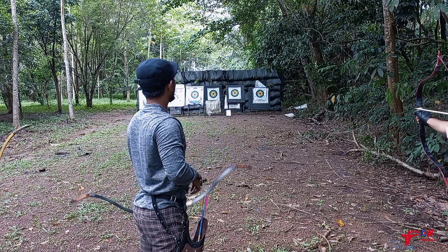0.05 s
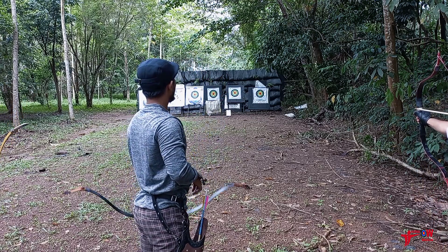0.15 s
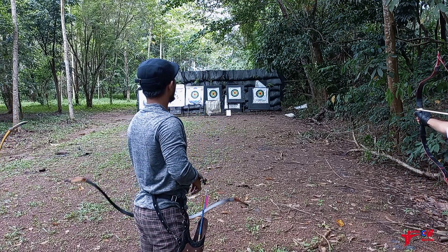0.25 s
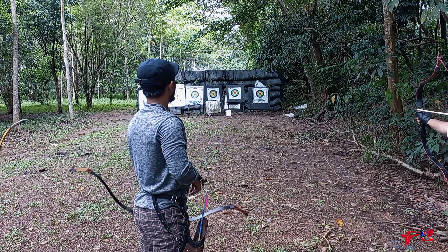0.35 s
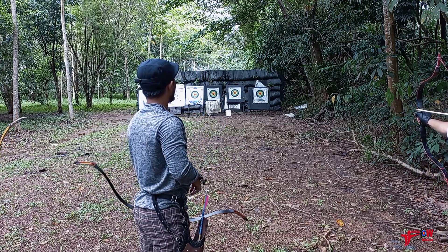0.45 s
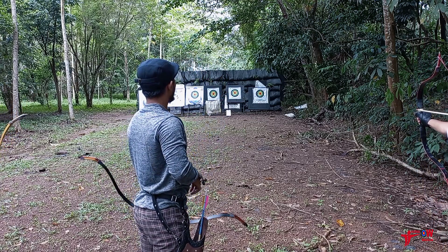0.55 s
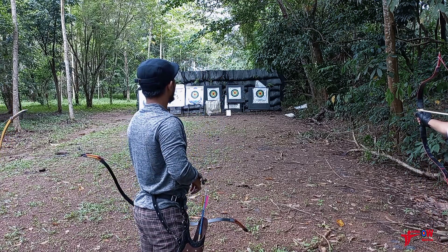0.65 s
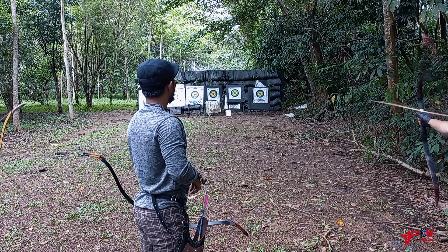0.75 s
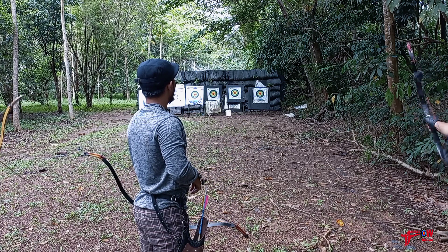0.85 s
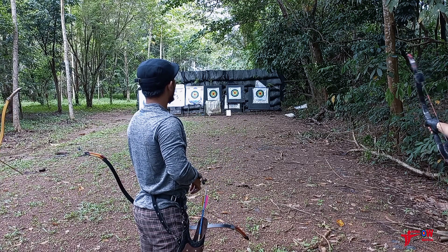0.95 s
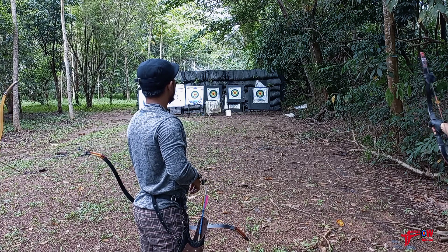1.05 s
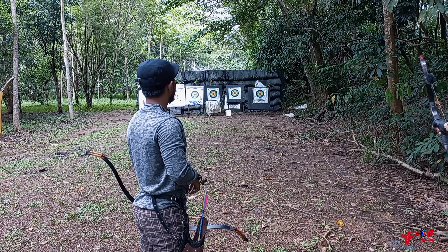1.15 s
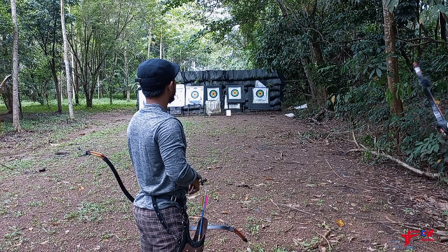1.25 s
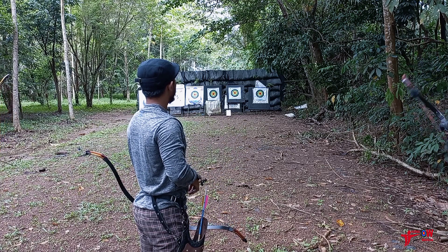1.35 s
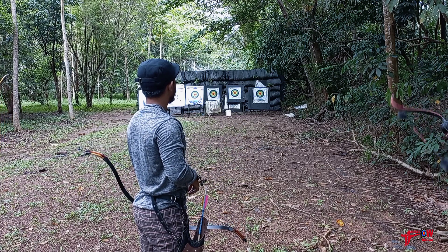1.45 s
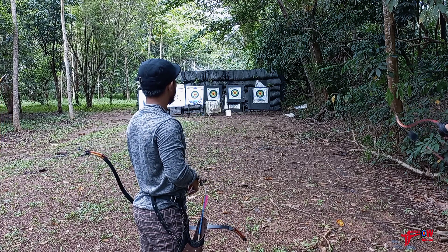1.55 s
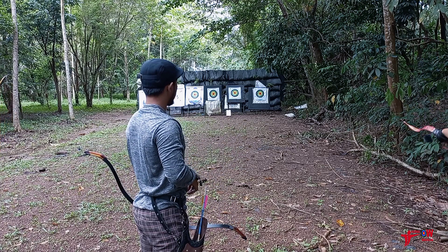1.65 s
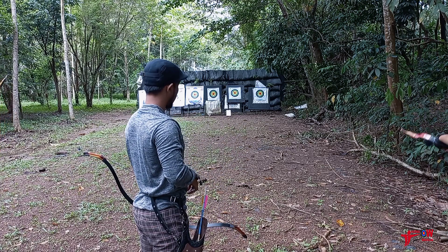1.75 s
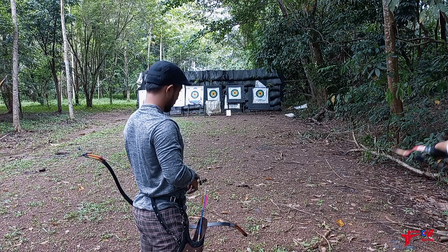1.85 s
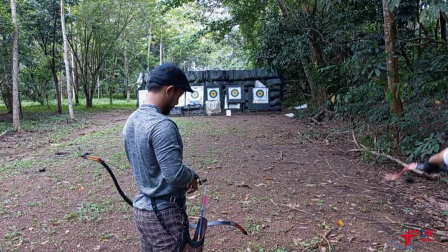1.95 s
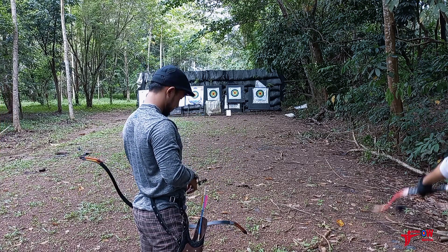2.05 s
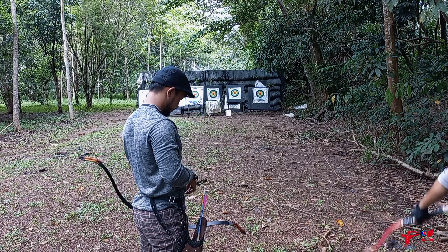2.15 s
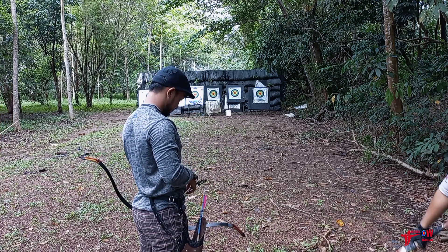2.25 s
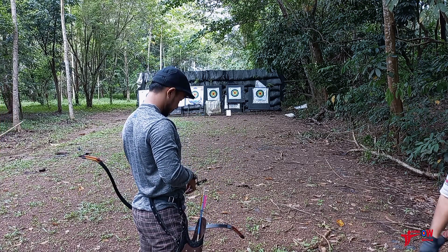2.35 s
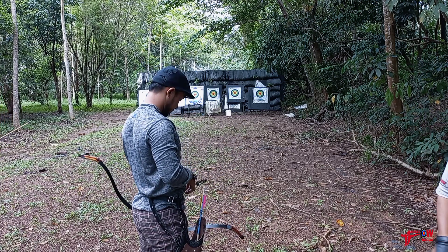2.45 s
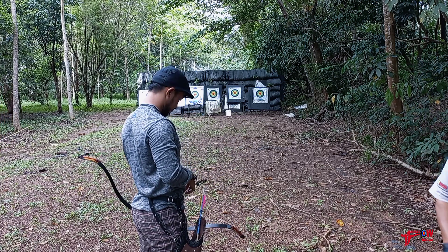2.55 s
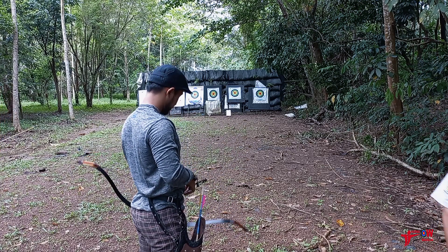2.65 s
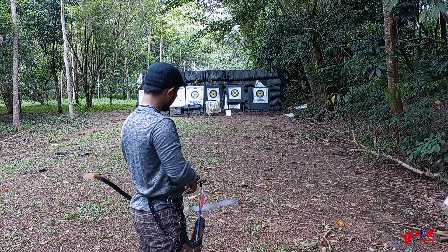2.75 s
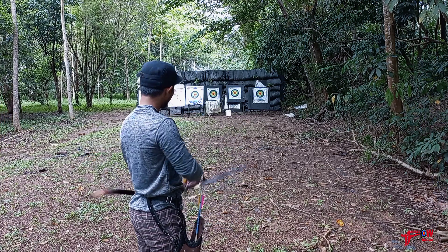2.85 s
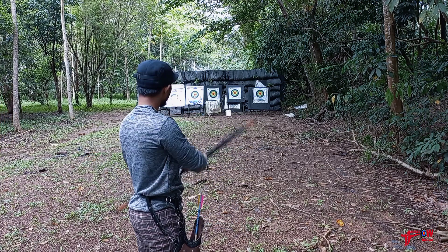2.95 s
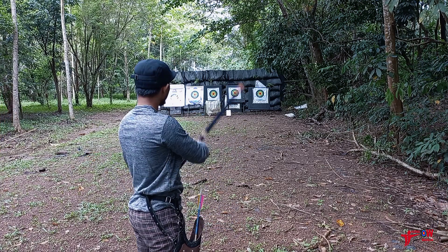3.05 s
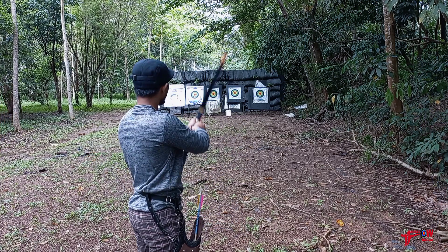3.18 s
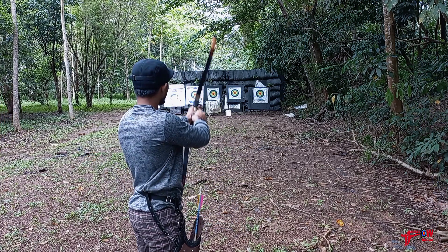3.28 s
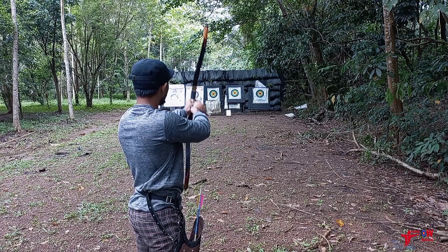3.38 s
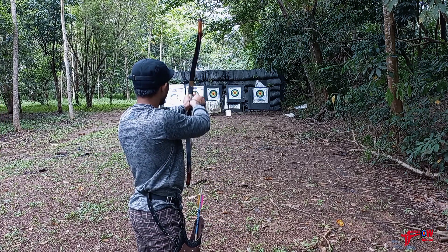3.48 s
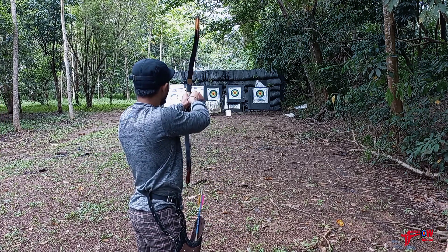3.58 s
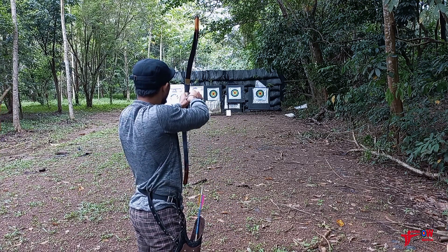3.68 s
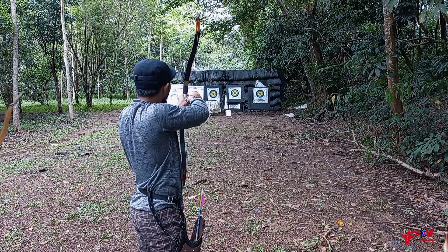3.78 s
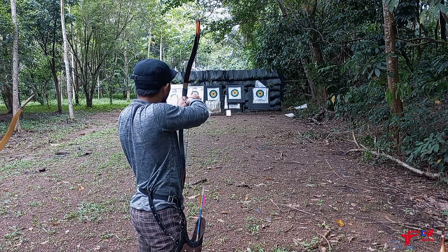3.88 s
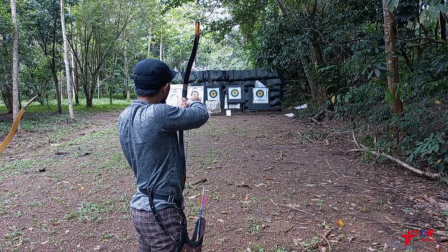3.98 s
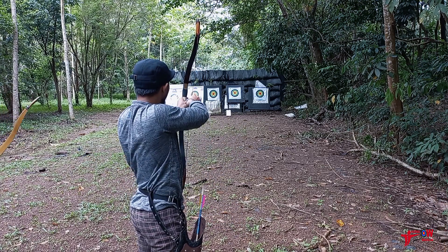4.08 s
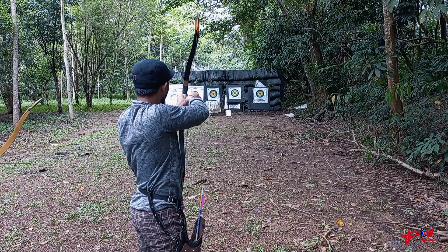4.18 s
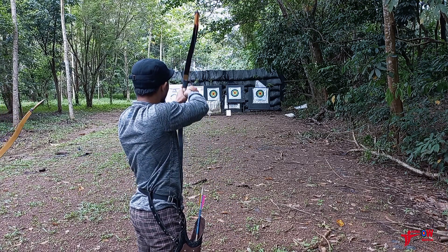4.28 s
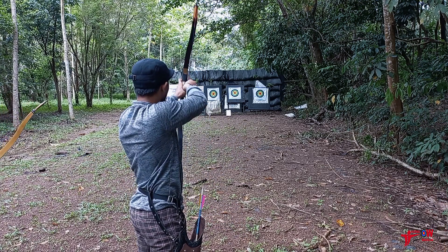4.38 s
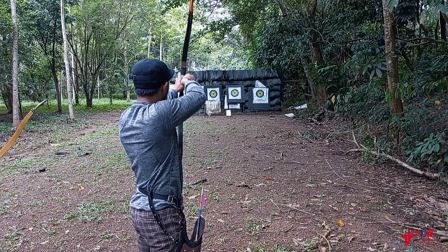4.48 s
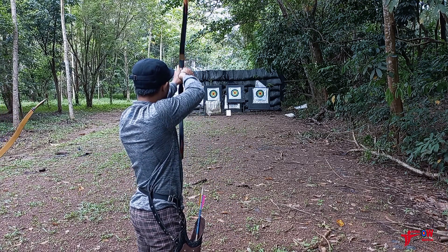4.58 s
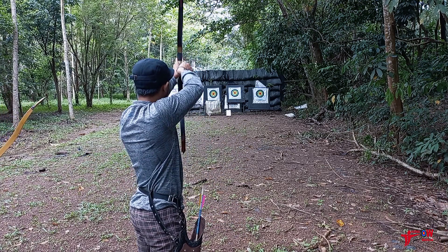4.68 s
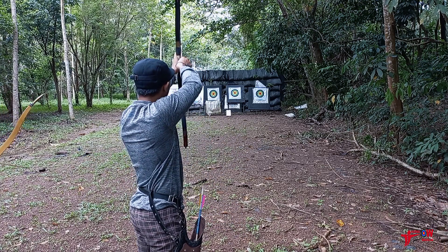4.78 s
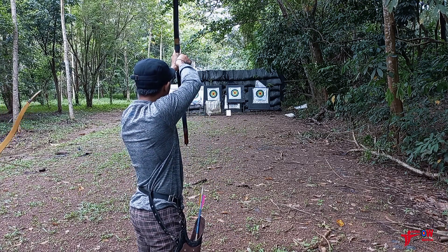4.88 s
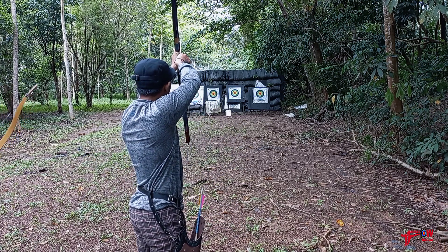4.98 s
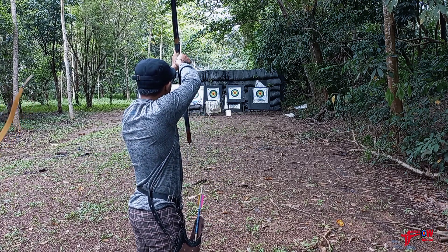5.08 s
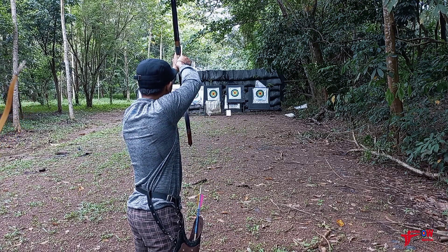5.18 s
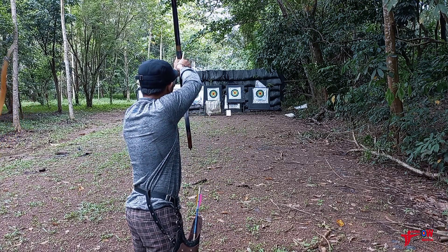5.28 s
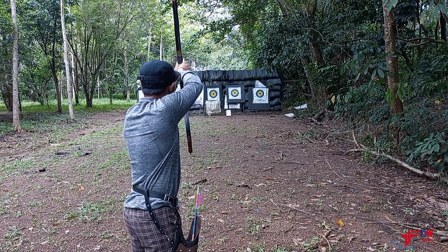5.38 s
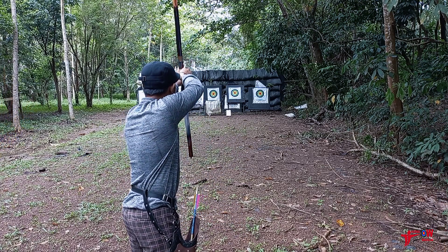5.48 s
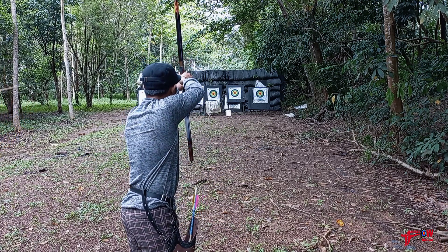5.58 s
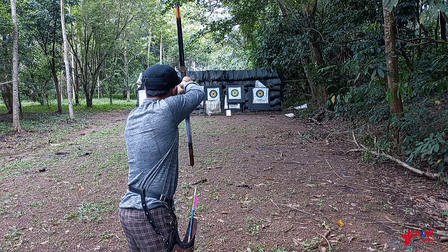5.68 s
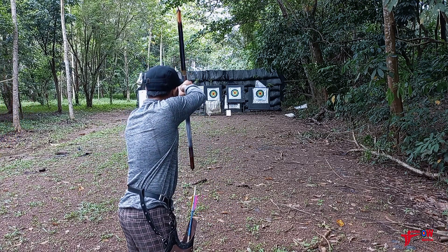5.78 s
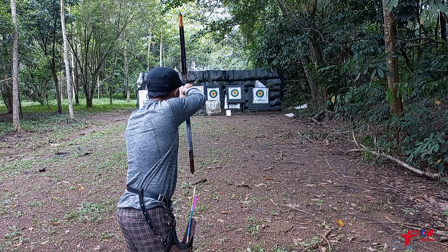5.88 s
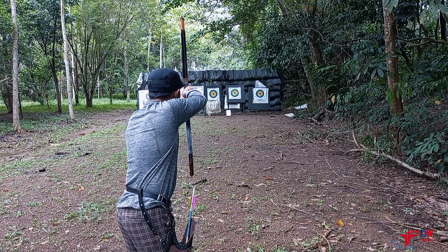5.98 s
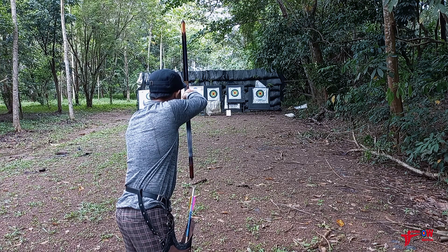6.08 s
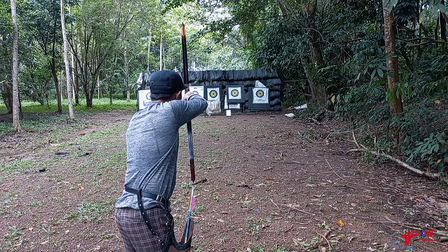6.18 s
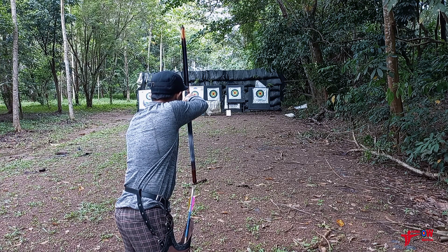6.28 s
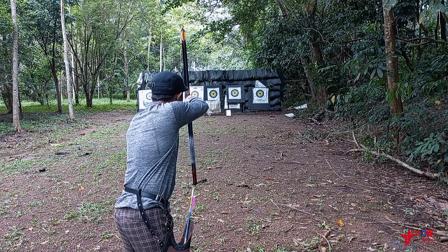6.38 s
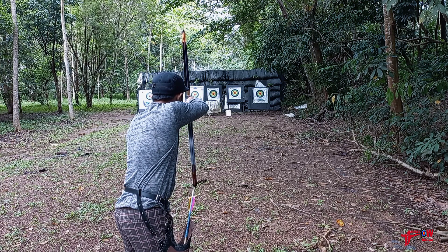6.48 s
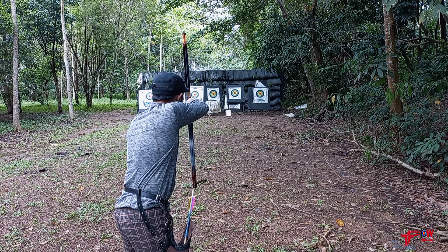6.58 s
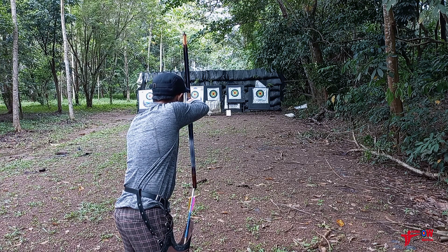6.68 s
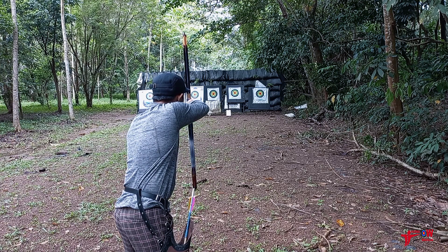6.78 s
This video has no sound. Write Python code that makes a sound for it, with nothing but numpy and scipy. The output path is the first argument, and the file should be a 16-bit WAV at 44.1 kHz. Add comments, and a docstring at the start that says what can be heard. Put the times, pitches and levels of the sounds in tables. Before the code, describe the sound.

Insects chirr steadily at an outdoor range among trees. An arrow shaft clicks lightly on a bow, then a nearby string slaps with a woody thump, and a far target cracks about half a second later. A second, sharper release and hit follow. Afterwards only soft bumps, sleeve brushes and faint ticks of another archer drawing remain. The microphone stands close behind the archers.

```python
"""Two bows loose close to the microphone: the string slips off the fingers, slaps home and the limbs thump.
About half a second later each arrow cracks into a far target, and the trees scatter the sound back.
A third archer quietly nocks and draws, while cicadas and crickets chirr over a low distant rumble.
Bursts and rubs are shaped noise, limbs, shafts and butts are decaying sines, and the wood is a diffuse
echo; cicadas are bands of noise, crickets are gliding tones."""
import sys
import numpy as np
from scipy import signal
from scipy.fft import rfft, irfft
from scipy.io import wavfile
from scipy.ndimage import uniform_filter1d

SR = 44100
rng = np.random.default_rng(int(sys.argv[2]) if len(sys.argv) > 2 else 0)


def transcribe(signal):
    """Save signal, clipped to [-1, 1], as a 16-bit WAV file at the path in sys.argv[1]."""
    frames = np.atleast_2d(signal).T
    limited = np.clip(frames, -1, 1)
    pcm = np.round(limited * 32767).astype(np.int16)
    wavfile.write(sys.argv[1], SR, pcm)


N = 301644
TIME = np.arange(N) / SR  # s
BRIEF = TIME[:16384]  # time axis of one short event, s


def undb(db):
    """Decibels to gain."""
    return 10 ** (np.asarray(db) / 20)


def unit(x):
    """Scale to rms 1."""
    return x / np.sqrt(np.mean(x ** 2) + 1e-20)


def add(out, s, x):
    """Mix x into out from time s, dropping whatever falls outside."""
    i = int(round(s * SR))
    x, i = x[max(-i, 0):], max(i, 0)
    out[i:i + len(x)] += x[:max(len(out) - i, 0)]


def curve(points, f):
    """Gain at each frequency f, from (f/Hz, level/dB) points joined on a log-frequency axis."""
    hz, db = np.transpose(points)
    return undb(np.interp(np.log(f + 1), np.log(hz), db))


def coloured(points, size):
    """Noise of rms 1 with a spectrum of (f/Hz, level/dB) points."""
    f = np.fft.rfftfreq(size, 1 / SR)
    white = rfft(rng.standard_normal(size))
    return unit(irfft(white * curve(points, f), size))


def band(hz, width_hz, size):
    """Noise of rms 1 in one bell-shaped resonance."""
    f = np.fft.rfftfreq(size, 1 / SR)
    bell = .5 ** (2 * ((f - hz) / width_hz) ** 2)
    return unit(irfft(rfft(rng.standard_normal(size)) * bell, size))


def walk(rate, size):
    """Random levels, rate of them a second, joined by straight lines."""
    place = TIME[:size] * rate
    return np.interp(place, np.arange(8192), rng.standard_normal(8192))


def fade(t, t60):
    """Exponential decay by 60 dB in t60 seconds, held at full level before t = 0."""
    return np.exp(-np.log(1000) * np.maximum(t, 0) / max(t60, 1e-3))


def ring(modes, tilt_db=0):
    """Struck modes as decaying sines, tilted in dB per octave about their mean pitch."""
    centre = np.mean([mode[0] for mode in modes])
    total = 0
    for hz, db, t60 in modes:
        gain = undb(db + tilt_db * np.log2(hz / centre))
        total = total + gain * np.sin(2 * np.pi * hz * BRIEF) * fade(BRIEF, t60)
    return total


def stroke(length, hz, width_hz):
    """One surface sliding over another: a resonant rub that swells and dies."""
    swell = np.sin(np.pi * np.minimum(BRIEF / length, 1))
    return swell * band(hz, width_hz, size=len(BRIEF))


def spread(points, envelope):
    """A burst as it radiates to all sides: the same energy, evened out to its mean colour."""
    return coloured(points, size=len(BRIEF)) * np.sqrt(np.mean(envelope ** 2))


# what the trunks do to the colour of the echo: [f/Hz, level/dB]
TREE_COLOUR = [(60, 7.5), (180, -3.5), (500, -0.5), (1000, 1), (2000, 3), (4000, 0), (8000, -1),
               (15000, -3)]


def wood(sound, hold_s, t60_s, treble_t60_s, blur_hz):
    """Every trunk hears another side of a sound: a diffuse echo of its blurred spectrum, fading in two bands."""
    t, f = TIME[:SR], np.fft.rfftfreq(SR, 1 / SR)
    power = uniform_filter1d(np.abs(rfft(sound, SR)) ** 2, max(int(blur_hz), 1))  # bins are 1 Hz apart
    colour = np.sqrt(np.abs(power)) * curve(TREE_COLOUR, f)
    scatter = rfft(rng.standard_normal(SR)) * colour / np.sqrt(SR)
    treble = 1 / (1 + (3500 / (f + 1)) ** 4)  # share of each frequency that fades with the treble
    tail = 0
    for share, t60 in [(1 - treble, t60_s), (treble, treble_t60_s)]:
        envelope = unit(fade(t - hold_s, t60) * np.minimum(t / 0.007, 1))
        tail = tail + irfft(scatter * share, SR) * envelope
    return tail * undb(2.1 * walk(170, size=SR) - 2.0)


# string slipping off the fingers and arrow sliding past the bow:
# [t/s, level/dB, hold before the decay/s, t60/s, echo relative level/dB]
SLIPS = [(0.8021, -21, 0.00736, .03, -14), (1.548, -39.5, 0.02, 0.055, 5)]
# colour of that slip: [f/Hz, level/dB]
SLIP_COLOUR = [(100, -3), (300, 0.5), (800, 1), (1600, -6.5), (3000, -8.5), (4500, -6.5), (5800, -3),
               (7000, -16.5), (8500, -14.5), (15000, -22)]
# string slapping home, one row a bow; the slap and limb levels flutter about these values:
# [t/s, level/dB, hold before the decay/s, t60/s, limb level/dB, echo relative level/dB]
SNAPS = [(0.8219, -15, 0.00244, 0.061, -22.5, -7), (1.5686, -12, 0.0012, 0.038, -34, -6)]
# colour of the slap, one list a bow: [f/Hz, level/dB]
SNAP_COLOURS = [
    [(88, -31.5), (150, -15), (420, -24.5), (1660, -23.5), (1910, -17), (2100, -25), (2310, -12.5),
     (2810, -19), (4650, -12.5), (7860, -21.5), (9360, -24), (13300, -25), (15500, -24.5)],
    [(88, -35), (150, -35), (618, -3.5), (1600, -5.5), (2600, -3.5), (3550, 2), (4750, 2), (5230, 1),
     (7410, -3.5), (8010, -1.5), (8660, -6), (12000, 1.5), (15500, -4.5)],
]
# ringing limbs and string, one list a bow: [f/Hz, level/dB, t60/s]
LIMB_MODES = [
    [(82, 2, 0.1), (174, -2, 0.084), (304, -2, 0.074), (372, -4, 0.064), (453, -7, 0.13),
     (803, -12.5, 0.16), (1880, -17, 0.1), (2407, -17.5, 0.28), (3336, -14, 0.17), (4070, -18, 0.2),
     (4800, -16, .2)],
    [(126, 4.5, 0.11), (376, -13, 0.31), (463, 1.5, 0.16), (600, -8.5, 0.49), (766, -11, 0.35),
     (990, -12, 0.11), (2140, -7, 0.26), (3160, -6, 0.12)],
]
# string rebounding on its limbs, one row a bow:
# [period/s, buzz f/Hz, width/Hz, first level/dB, change per rebound/dB]
REBOUNDS = [(0.02, 5200, 590, -28.5, -5), (0.0099, 2960, 340, -23.5, -27)]


def bows():
    """Close by: the string slips as a noise burst, slaps home, sets limbs ringing and buzzes on each rebound."""
    size = len(BRIEF)
    sounds = []  # (t/s, direct sound, sound sent into the trees, echo level/dB)
    for s, db, hold, t60, echo_db in SLIPS:
        envelope = undb(db) * np.minimum(BRIEF / 0.0034, 1) * fade(BRIEF - hold, t60)
        slip = envelope * coloured(SLIP_COLOUR, size)
        sounds.append((s, slip, spread(SLIP_COLOUR, envelope), echo_db))
    for snap, colour, modes, rebound in zip(SNAPS, SNAP_COLOURS, LIMB_MODES, REBOUNDS):
        s, db, hold, t60, limb_db, echo_db = snap
        envelope = undb(db) * np.minimum(BRIEF / 0.00045, 1) * fade(BRIEF - hold, t60)
        rattle = undb(4.2 * walk(1124, size))
        slap = envelope * coloured(colour, size) * rattle
        sounds.append((s, slap, spread(colour, envelope), echo_db))
        limbs = undb(limb_db + 3.0 * walk(106, size)) * ring(modes)
        sounds.append((s + 0.0027, limbs, limbs, echo_db - 6.5))
        period, buzz_hz, width_hz, buzz_db, change_db = rebound
        for k in range(5):
            buzz = undb(buzz_db + k * change_db) * stroke(0.012, buzz_hz, width_hz)
            sounds.append((s + (k + 1) * period, buzz, buzz, echo_db))
    out = np.zeros(N)
    for s, sound, sent, echo_db in sounds:
        add(out, s, sound)
        echo = wood(sent, hold_s=.01, t60_s=.57, treble_t60_s=.6, blur_hz=300)
        add(out, s, undb(echo_db) * echo)
    return out


# arrows striking, one row a target: [t/s, crack level/dB, crack t60/s, shaft chatter level/dB,
# thud delay/s, thud level/dB, thud pitch ratio, echo relative level/dB]
HITS = [(1.272, -21, 0.0423, -10.5, .0068, -22, 1.02, 0.5),
        (2.0321, -21, 0.021, -26, 0.00095, -26, 1.043, 4)]
# colour of the crack, one list a target: [f/Hz, level/dB]
CRACK_COLOURS = [
    [(150, -22.5), (600, 0.5), (1000, -4), (1300, -1.5), (1650, 2.5), (2100, -2), (2800, -0.5),
     (3600, -7.5), (4700, 5), (6200, -4.5), (9000, -4.5), (15000, -25.5)],
    [(150, -6), (480, -9), (900, 3), (1250, -3.5), (1700, -5.5), (3000, 2), (4200, -8), (5600, 0),
     (9000, -8), (15000, -20)],
]
# ringing target butt, before the pitch ratio of each hit: [f/Hz, level/dB, t60/s]
BUTT_MODES = [(121.5, -2.5, .085), (178.6, 3.5, 0.075), (267, -2.5, 0.0857), (445, -9.5, .07),
              (600, -15, 0.049)]
CHATTER_HZ, CHATTER_S = 1734, 0.0024  # middle of the downward glide; length of the glide


def targets():
    """Far off: the point cracks the face, the shaft chatters as it sinks in, then the butt thuds."""
    out = np.zeros(N)
    for hit, colour in zip(HITS, CRACK_COLOURS):
        s, crack_db, t60, chatter_db, delay, thud_db, pitch, echo_db = hit
        envelope = undb(crack_db) * fade(BRIEF - .0012, t60)
        crack = envelope * coloured(colour, size=len(BRIEF))
        # stick and slip slow down with the arrow
        glide = 1 + 0.18 * np.clip(1 - 2 * BRIEF / CHATTER_S, -1, 1)
        phase = 2 * np.pi * np.cumsum(CHATTER_HZ * glide) / SR
        stick_slip = np.sin(phase) + 0.139 * np.sin(2 * phase)
        chatter = undb(chatter_db) * stick_slip * fade(BRIEF - CHATTER_S, 0.0039)
        butt = [(hz * pitch, db, ring_s) for hz, db, ring_s in BUTT_MODES]
        thud = undb(thud_db) * ring(butt)
        add(out, s, crack + chatter)
        add(out, s + delay, thud)
        sent = spread(colour, envelope) + undb(-21) * chatter
        crack_echo = wood(sent, hold_s=0.043, t60_s=0.63, treble_t60_s=0.82, blur_hz=262)
        add(out, s, undb(echo_db) * crack_echo)
        thud_echo = wood(thud, hold_s=0.051, t60_s=0.49, treble_t60_s=.4, blur_hz=152)
        add(out, s + delay, undb(echo_db - 9) * thud_echo)
    return out


# arrow tapping a bow: [t/s, level/dB, brightness/dB per octave]
TAPS = [(.136, -39, 3), (0.329, -32, 10), (1.069, -22, 3.5), (1.2155, -20, 8.5), (1.2217, -28, 2.5),
        (4.909, -44, 19), (5.5, -51, 9)]
# ringing arrow shaft: [f/Hz, level/dB, t60/s]
SHAFT_MODES = [(890, -23.5, 0.068), (1024, -14.5, 0.0934), (1355, -14, 0.12), (1787, -20.5, 0.057),
               (1963, -20.5, 0.055), (2330, -15, .05), (2772, -17, 0.034), (3380, -10, 0.029),
               (4540, -3, 0.011), (4840, -15, 0.032), (5940, -10, 0.025)]


def taps():
    """An arrow tapping a bow: the shaft modes ring under a bright tick of noise."""
    out = np.zeros(N)
    for s, db, tilt_db in TAPS:
        tick = band(5700, 4920, size=len(BRIEF)) * fade(BRIEF, 0.042)
        onset = np.minimum(BRIEF / 0.00043, 1)
        tap = undb(db) * (ring(SHAFT_MODES, tilt_db) + 0.43 * tick) * onset
        add(out, s, tap)
        echo = wood(tap, hold_s=0.008, t60_s=0.7, treble_t60_s=0.46, blur_hz=600)
        add(out, s, undb(-8.0) * echo)
    return out


# soft bumps of hand and arrow on the bow while nocking and gripping:
# [t/s, level/dB, brightness/dB per octave]
BUMPS = [(2.752, -60.5, 0), (2.9, -53, -6.5), (2.928, -54.5, -5.5), (3.502, -56.5, 4), (3.748, -52.5, -4.5),
         (3.819, -53.5, -3), (3.876, -54.5, 4.5), (3.935, -50, -7), (4.769, -50, -1), (4.847, -54.5, -2),
         (5.01, -59.5, 5), (5.07, -57, 6), (5.165, -57, 7)]
# colour of a bump: [f/Hz, level/dB]
BUMP_COLOUR = [(120, -6), (330, 1.5), (480, 1), (620, -3), (850, 0), (1300, -6.5), (2200, -13.5),
               (4000, -24), (12000, -47)]
BUMP_ATTACK_S, BUMP_T60_S, BUMP_PIVOT_HZ = 0.007, 0.096, 700  # brightness tilts about the pivot
# sleeve brushing along with each move of an arm: [t/s, level/dB, length/s]
SWEEPS = [(0.089, -58, 0.2), (3.352, -62.5, .13), (3.646, -59, 0.049), (4.302, -58.5, 0.26),
          (5.06, -62, 0.22)]
# colour of the sleeve: [f/Hz, level/dB]
SLEEVE_COLOUR = [(200, -8), (500, -3), (850, -1.5), (1200, -0.5), (1700, -9.5), (2600, -0.5), (6000, -7),
                 (12000, -28)]
# arrow scraping over the bow in short jerks during the draw: [t/s, level/dB]
SCRAPES = [(5.728, -51), (5.756, -51.5)]


def handling():
    """The third archer: soft bumps of the grip, brushing sleeves and the scrape of the draw, as grainy noise."""
    size = len(BRIEF)
    sounds = []  # (t/s, level/dB, sound)
    for s, db, tilt_db in BUMPS:
        colour = [(hz, level + tilt_db * np.log2(hz / BUMP_PIVOT_HZ)) for hz, level in BUMP_COLOUR]
        envelope = np.minimum(BRIEF / BUMP_ATTACK_S, 1) * fade(BRIEF - BUMP_ATTACK_S, BUMP_T60_S)
        sounds.append((s, db, envelope * coloured(colour, size)))
    for s, db, length in SWEEPS:
        swell = np.sin(np.pi * np.minimum(BRIEF / length, 1))
        sounds.append((s, db, swell * coloured(SLEEVE_COLOUR, size)))
    for s, db in SCRAPES:
        sounds.append((s, db, stroke(length=0.017, hz=1310, width_hz=720)))
    out = np.zeros(N)
    for s, db, sound in sounds:
        grainy = undb(db + 4 * walk(228, size)) * sound
        add(out, s, grainy)
        echo = wood(grainy, hold_s=0.0099, t60_s=0.37, treble_t60_s=.4, blur_hz=300)
        add(out, s + .015, undb(-5.5) * echo)
    return out


# cicada choruses: [f/Hz, width/Hz, level/dB, grain/dB, throbs per s, throb depth 0-1]
CICADAS = [(2890, 240, -61, 1, 0, 0), (3183, 251, -47.5, -0.2, 0, 0), (3575, 130, -62, 3.5, 0, 0),
           (4950, 603, -50.5, 1.5, 31, 0.14), (6610, 1060, -45.5, 2.5, 0, 0), (7192, 748, -37.5, 0.5, 0, 0),
           (8400, 590, -58, 0, 1, 0), (9490, 500, -55, -0.5, 68.5, 0.2), (12320, 690, -45, 4, 66.5, 0.1),
           (12790, 350, -45, -1, 67, .3), (14100, 1800, -50, 0.5, 0, 0)]


def cicadas():
    """Many tymbals ring in shared resonances: their clicks merge into grainy bands of noise, some throbbing."""
    out = 0
    for hz, width_hz, db, grain_db, rate, depth in CICADAS:
        grain = grain_db * walk(330, size=N)
        swell = 0.55 * walk(25, size=N) + 0.38 * walk(1.243, size=N)
        unsteady_rate = rate * (1 + .05 * walk(8, size=N))
        throb = 1 + depth * np.cos(2 * np.pi * np.cumsum(unsteady_rate) / SR)
        chirr = band(hz, width_hz, size=N) * undb(grain + swell) * throb
        out = out + undb(db) * unit(chirr)
    return out


# each cricket repeats its trill at its own steady pace:
# [first start t/s, period/s, length/s, first f/Hz, last f/Hz]
CRICKET_SONGS = [(.59, 1.487, .93, 3080, 2978), (-.68, 1.96, 1.2, 2945, 2836), (.9, 1.64, .95, 3112, 3040)]
# loudness of each cricket, its level before a common trim, its partials relative to the fundamental:
# [level/dB, octave level/dB, double octave level/dB]
CRICKET_LEVELS = [(-51.5, 4.5, 14.5), (-50, 2, 4), (-66.5, 4, 2)]
WING_HZ, WING_DEPTH = 160.8, 0.17  # mean wing strokes per s, depth of their swell 0-1
TRILL_RISE_S, TRILL_FALL_S = 0.17, 0.12


def crickets():
    """Wing tones that sag in pitch; each wing stroke swells and bends them, paths through the foliage beat."""
    out = np.zeros(N)
    for song, (db, octave_db, top_db) in zip(CRICKET_SONGS, CRICKET_LEVELS):
        first_s, period, length, first_hz, last_hz = song
        size = int(length * SR)
        t = TIME[:size]
        left = 1 - t / length
        hz = last_hz + (first_hz - last_hz) * (left + left ** 2) / 2
        swell = np.clip(np.minimum(t / TRILL_RISE_S, (length - t) / TRILL_FALL_S), 0, 1)
        for s in np.arange(first_s, TIME[-1], period):
            wing = 2 * np.pi * np.cumsum(WING_HZ + 16 * walk(90, size)) / SR
            bend = -.11 * np.sin(wing) + .07 * np.cos(2 * wing)
            phase = 2 * np.pi * np.cumsum(hz + 3.5 * walk(120, size)) / SR + bend
            tone = 0
            for k, part_db in enumerate([0, octave_db, -7, top_db]):
                paths = undb(part_db + 3.3 * walk(30.24, size))
                tone = tone + paths * np.sin((k + 1) * phase + .5 * walk(31.2, size))
            add(out, s, undb(db - 2.5) * tone * (1 + WING_DEPTH * np.cos(wing)) * swell)
    return out


# colour of the distant rumble and faint hiss: [f/Hz, level/dB]
AIR_COLOUR = [(20, -2), (35, -22.5), (50, 7), (80, -1.5), (130, -3.5), (180, -19), (260, -23.5),
              (450, -34.5), (900, -32.5), (2000, -37), (4000, -28), (8000, -33.5), (11000, -22.5),
              (15500, -30)]
# low distant drone: [start t/s, f/Hz, width/Hz, level/dB]
DRONE = (4.5, 151.5, 23, -60.5)


def air():
    """Distant rumble and faint hiss as noise of barely wavering level, and a low drone that comes in later."""
    s, hz, width_hz, db = DRONE
    drone = undb(db) * band(hz, width_hz, size=N) * np.clip((TIME - s) / 0.23, 0, 1)
    level = undb(-46.5 + 0.21 * walk(3.365, size=N))
    return coloured(AIR_COLOUR, size=N) * level + drone


def scene():
    """All sources at one microphone."""
    archers = bows() + targets() + taps() + handling()
    return (archers + cicadas() + crickets() + air())[None]


def record(dry):
    """The recorder cuts the deep bass below 45.3 Hz and the top above 15350 Hz."""
    bass_cut = signal.butter(5, 45.3, "high", fs=SR, output="sos")
    top_cut = signal.ellip(10, .2, 70, 15350, fs=SR, output="sos")
    return signal.sosfilt(top_cut, signal.sosfilt(bass_cut, dry))


dry = scene()
out = record(dry)
transcribe(out)
```